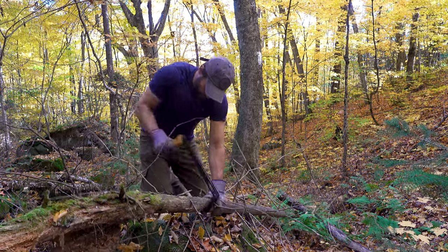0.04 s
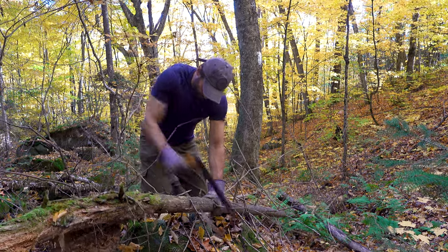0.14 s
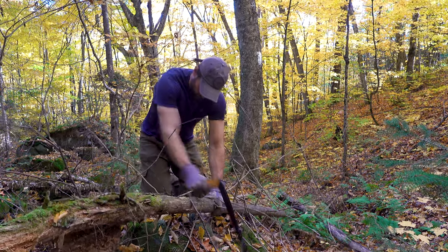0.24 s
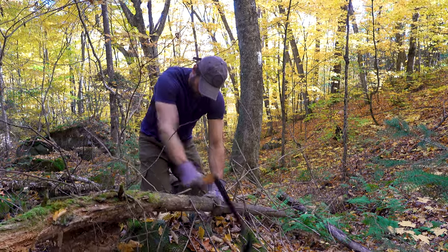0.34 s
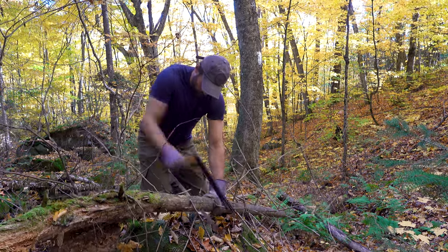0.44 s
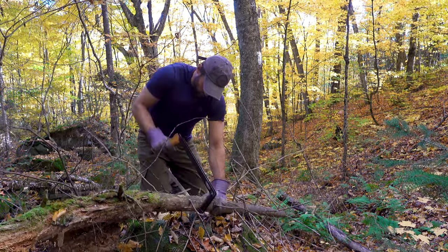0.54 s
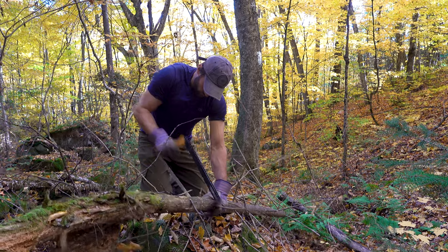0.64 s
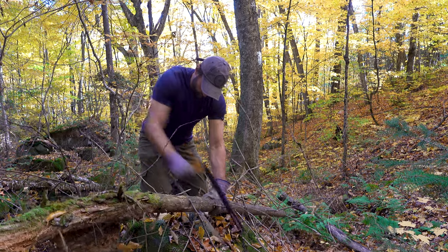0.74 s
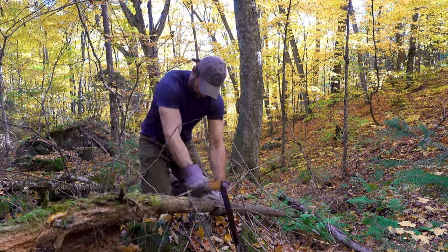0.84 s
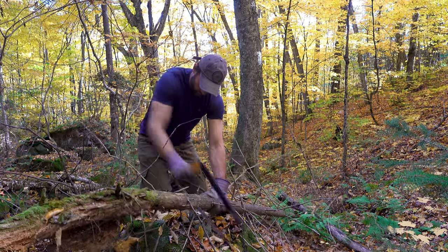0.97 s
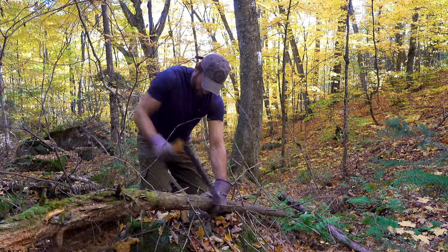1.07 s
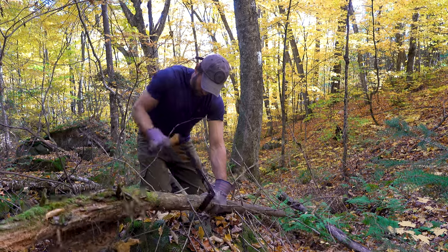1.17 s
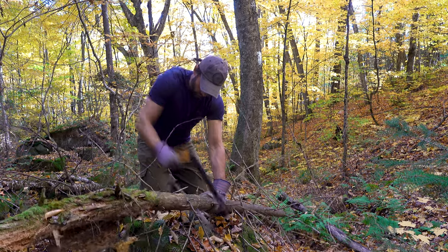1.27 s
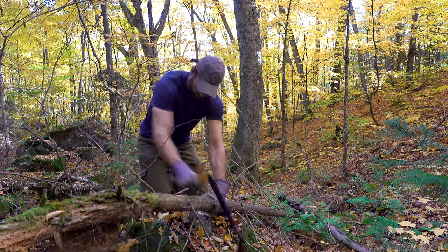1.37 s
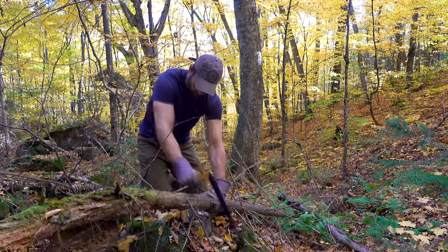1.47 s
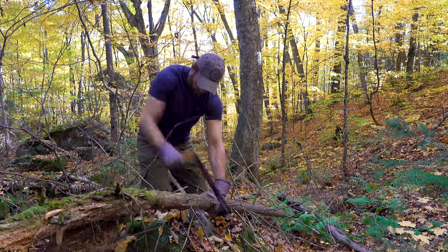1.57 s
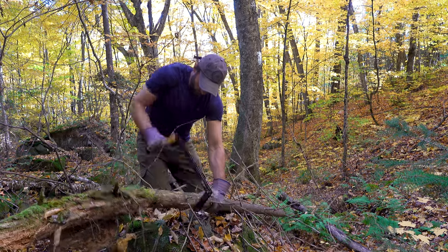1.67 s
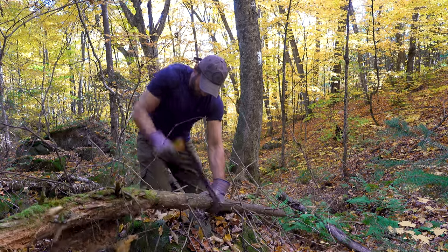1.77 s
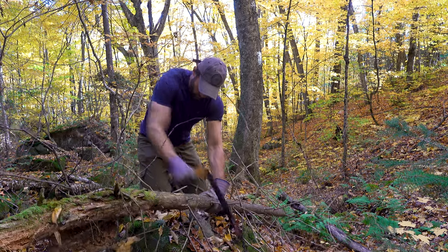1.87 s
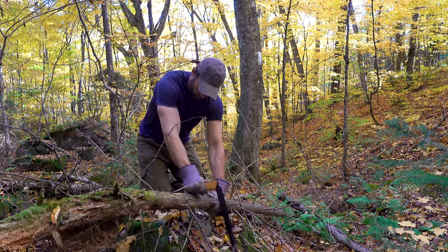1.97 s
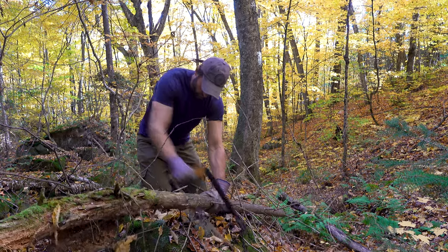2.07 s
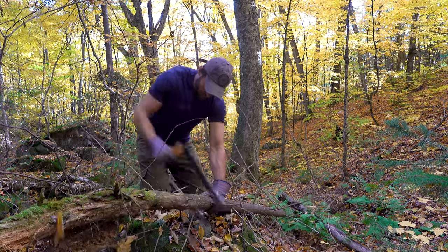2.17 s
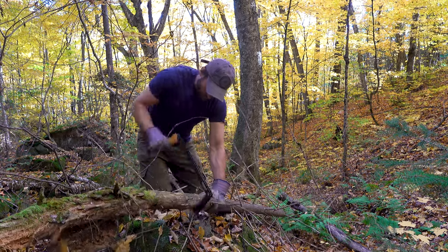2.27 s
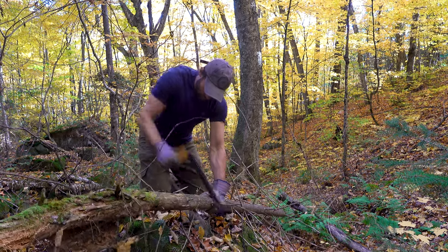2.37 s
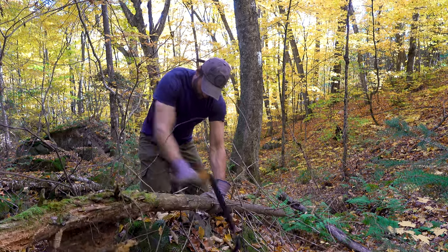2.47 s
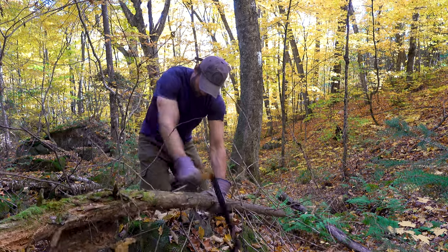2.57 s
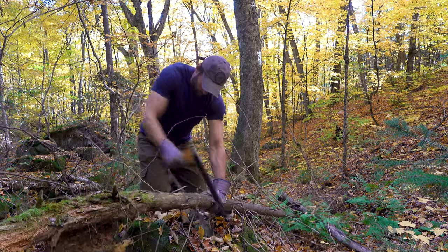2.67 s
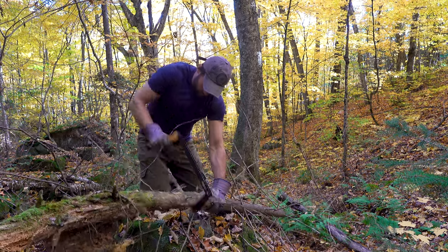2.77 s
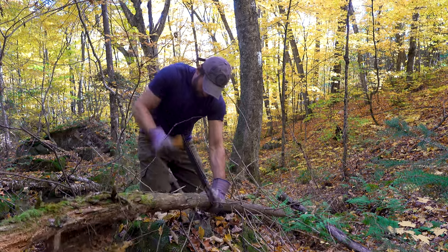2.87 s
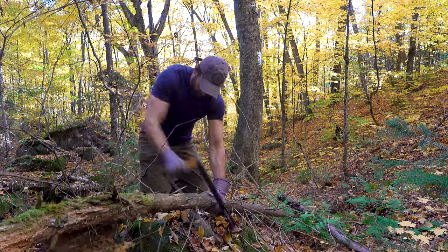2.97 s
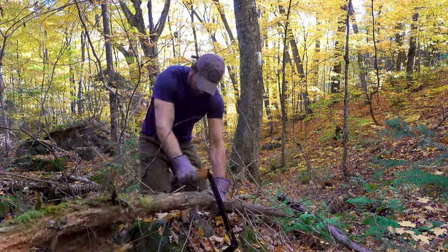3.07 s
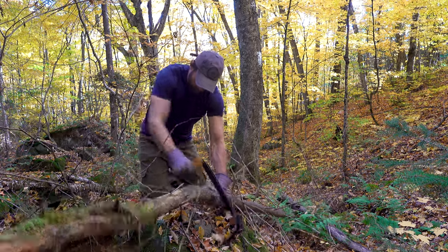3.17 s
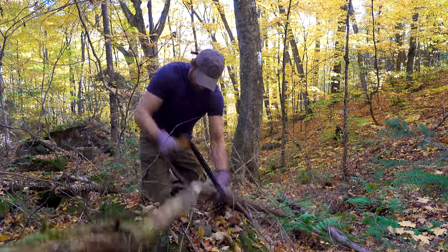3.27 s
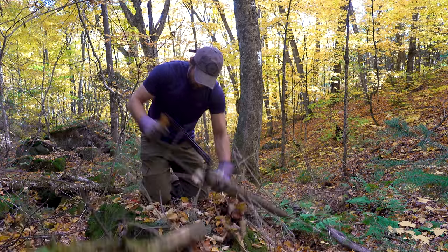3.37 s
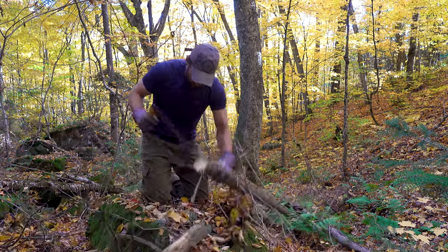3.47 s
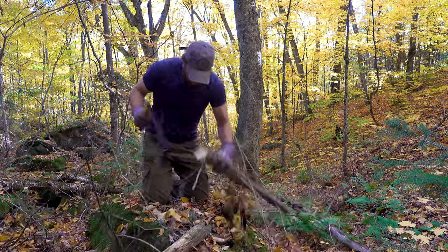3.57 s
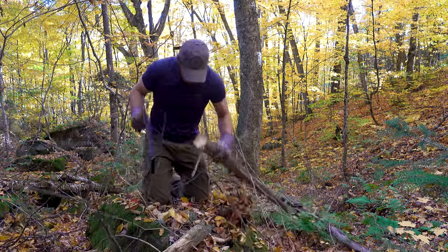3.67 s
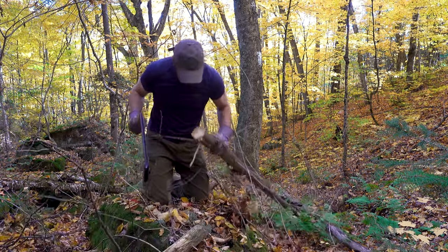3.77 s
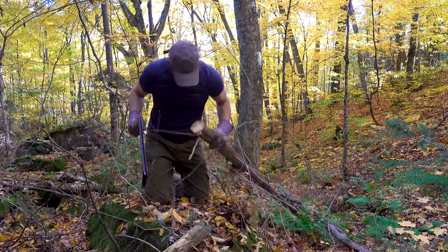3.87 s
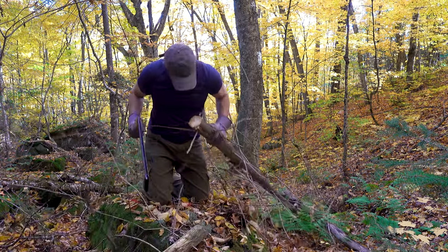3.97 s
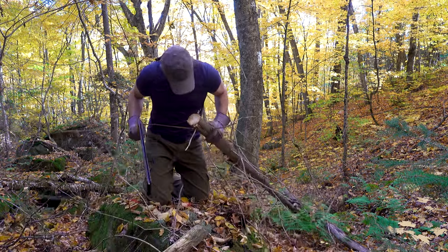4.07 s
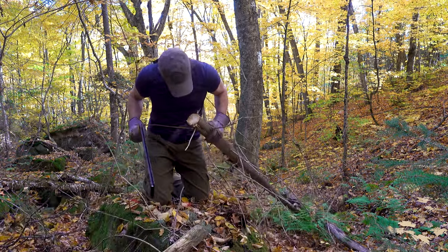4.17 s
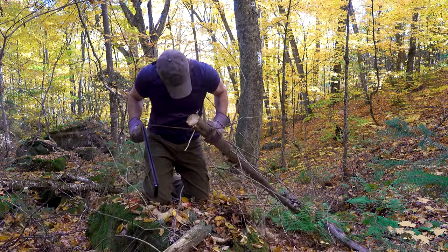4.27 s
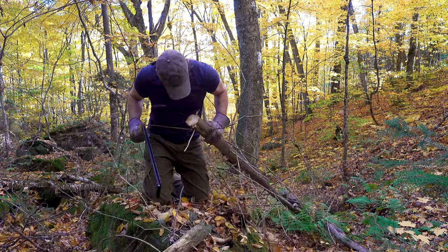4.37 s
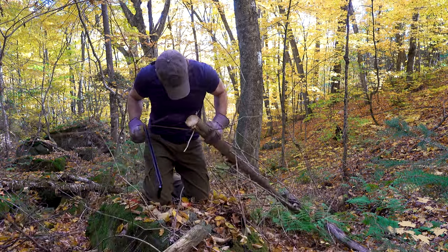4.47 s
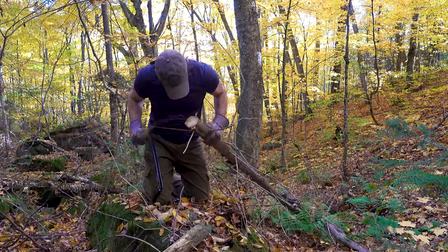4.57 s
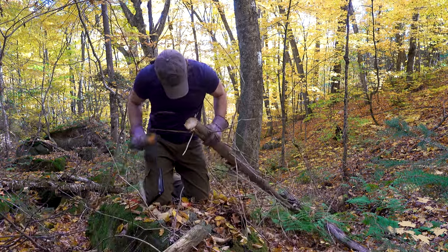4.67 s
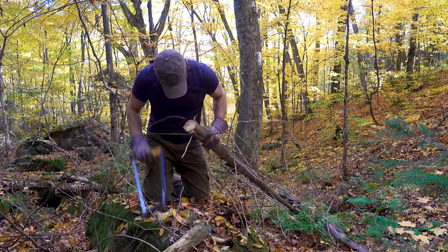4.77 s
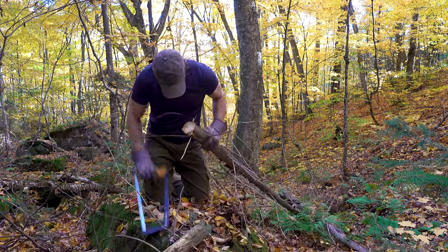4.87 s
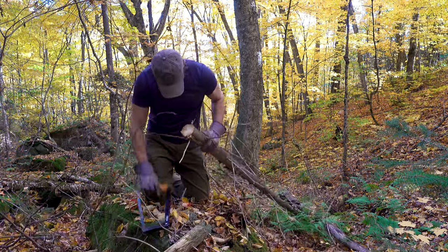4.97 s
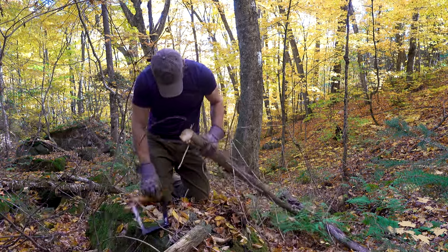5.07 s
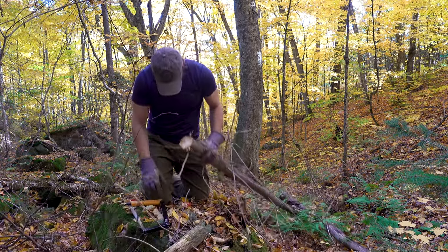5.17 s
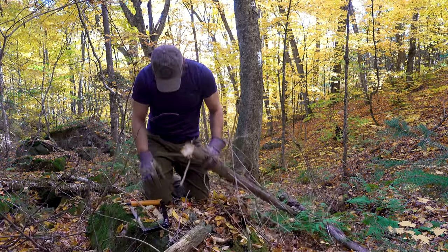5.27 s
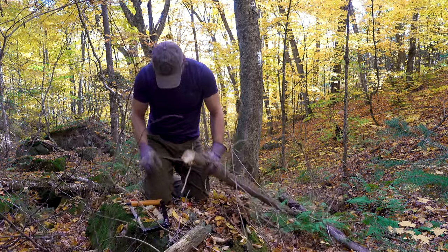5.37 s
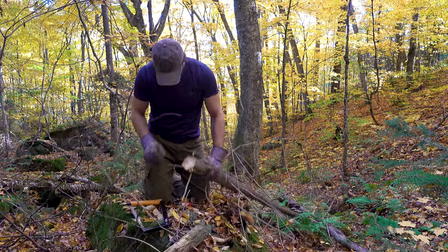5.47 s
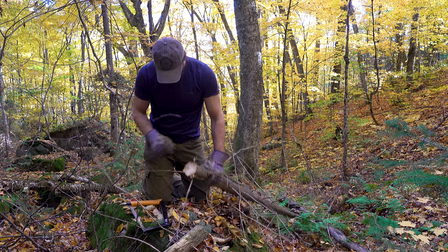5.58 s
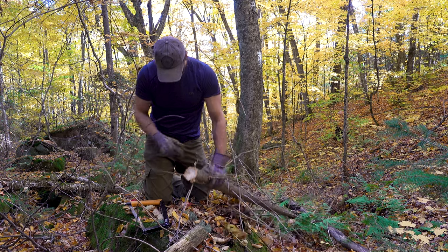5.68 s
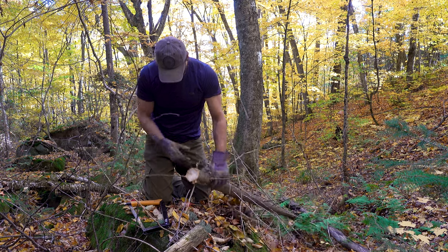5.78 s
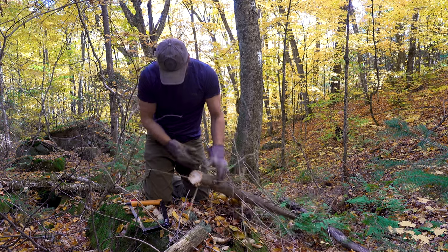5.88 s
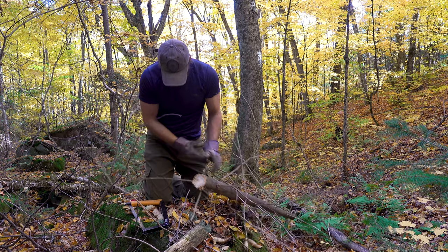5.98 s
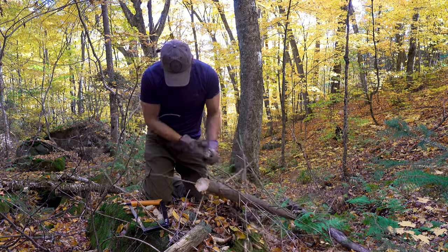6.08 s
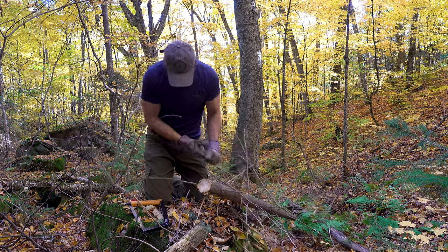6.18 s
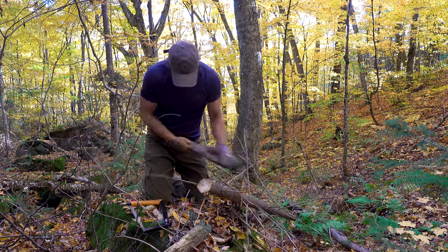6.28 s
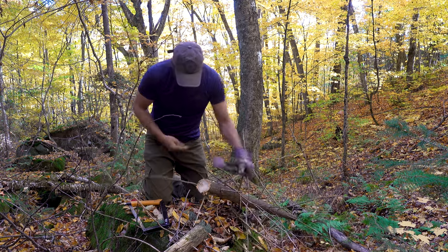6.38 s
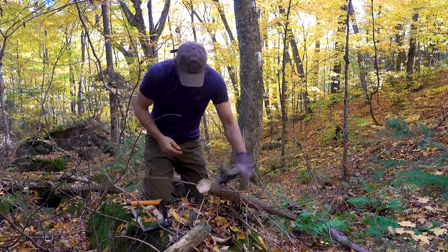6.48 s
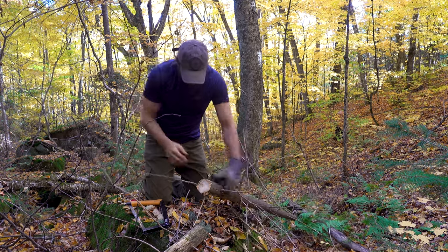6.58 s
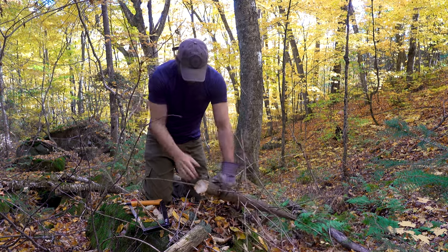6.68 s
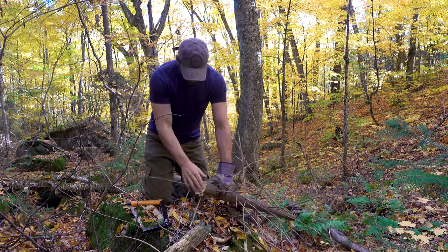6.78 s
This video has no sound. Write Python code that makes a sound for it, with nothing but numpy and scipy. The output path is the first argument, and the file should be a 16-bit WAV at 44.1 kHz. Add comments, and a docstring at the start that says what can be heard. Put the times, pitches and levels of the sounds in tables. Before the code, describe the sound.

Back-and-forth hand sawing ends in cracking wood and crunching leaves, then a metallic clank and softer rustles in a quiet forest.

```python
"""Sawing a fallen branch

In a quiet forest a hand saw makes six biting pushes, each after a lighter pull: its teeth strike the
wood and tear fibres, exciting the blade's resonances. The last fibres snap, the log drops into dry
leaves, the saw is tossed down with a clank, and gloves, twigs and leaves rustle as the log is handled."""
import sys
import numpy as np
from scipy import signal
from scipy.fft import rfft, irfft
from scipy.io import wavfile
from scipy.ndimage import uniform_filter1d

SR = 44100
rng = np.random.default_rng(int(sys.argv[2]) if len(sys.argv) > 2 else 0)


def unload_audio(sound):
    """Save the sound as a 16-bit wav file, at the path given as the first command line argument."""
    columns = np.transpose(np.atleast_2d(sound))
    # keep every value between -1 and 1, then stretch to whole-number steps
    steps = np.round(np.clip(columns, -1, 1) * 32767)
    wavfile.write(sys.argv[1], SR, steps.astype(np.int16))


N = 300759
TIME = np.arange(N) / SR

# Jolts of the branch as the blade jams at the end of a pull, and later as the log falls and is handled: (time
# [s], peak level [dB], treble tilt [dB per two octaves])
KNOCKS = [(0.609, -29.5, -11), (1.187, -26.5, -12), (1.727, -24, -14), (2.186, -21.5, 11),
          (2.309, -23.5, -9), (2.833, -10.5, -7), (3.119, -12.5, 6), (3.157, -14.5, 0), (3.208, -16, 1),
          (3.292, -32, -8), (5.748, -39, -7), (6.532, -32.5, 5)]
# Spectral envelope of breaking fibres: (frequency [Hz], relative level [dB])
SNAP_SPECTRUM = [(60, -26), (400, -5.5), (1200, 3), (3200, 4.5), (6000, 3.5), (8300, 7), (10000, -2),
                 (13000, 1.5), (16000, -5)]


def gain_of(db):
    """Amplitude ratio of a level in decibels."""
    return 10 ** (np.asarray(db) / 20)


def unit_rms(x):
    """Normalisation to unit mean power."""
    return x / np.sqrt(np.mean(x ** 2) + 1e-20)


def value_at(points, hz):
    """Interpolation along a logarithmic frequency axis."""
    f, value = np.transpose(points)
    return np.interp(np.log(hz + 1), np.log(f + 1), value)


def add(mix, s, sound):
    """Superposition of a sound on the mix from time s."""
    part = mix[max(round(s * SR), 0):][:len(sound)]
    part += sound[:len(part)]


def split(x, hz, order=4):
    """Complementary filtering into the parts below and above a frequency."""
    low = signal.sosfiltfilt(signal.butter(order, hz, fs=SR, output="sos"), x)
    return low, x - low


def slow_noise(count, span):
    """A moving average over span samples leaves only slow fluctuations."""
    return unit_rms(uniform_filter1d(rng.standard_normal(count), span))


def crackle(per_s, spread_db, count):
    """A Poisson train of impulses: many small, a few large."""
    size = gain_of(spread_db * np.minimum(rng.exponential(1, count), 4))
    return unit_rms(size * rng.choice([-1, 1], count) * (rng.random(count) < per_s / SR))


def swell(peak_s, fade_s):
    """Amplitude envelope of a movement: a Gaussian rise and a slower fall."""
    offset = (TIME - peak_s) / fade_s
    return np.exp(-np.where(offset < 0, (offset / 0.81) ** 2, abs(offset) ** 1.24))


def body(spectrum, modes=(), tilt_db=0, size=8192):
    """Minimum-phase impulse response of a broad spectrum with Lorentzian resonances on top."""
    hz = np.fft.rfftfreq(size, 1 / SR)
    lift = 1 + sum((gain_of(db) ** 2 - 1) / (1 + (2 * (hz - f) / width) ** 2) for f, width, db in modes)
    slope = tilt_db * np.log2(np.maximum(hz, 1500) / 3000)
    magnitude = gain_of(value_at(spectrum, hz) + slope) * np.sqrt(np.maximum(lift, 1e-2))
    cepstrum = irfft(np.log(magnitude))
    cepstrum[1:size // 2] *= 2  # folding the cepstrum makes the response causal
    cepstrum[size // 2 + 1:] = 0
    response = irfft(np.exp(rfft(cepstrum)))[:size // 2]
    return response / np.linalg.norm(response)


def impact(response, peak_db, t60, scatter, count=6000):
    """Impulse excitation: one sharp contact and a dying spray of smaller ones ring a body."""
    force = scatter * crackle(11000, 2.3, count) * np.exp(-np.log(1000) * TIME[:count] / t60)
    force[0] += 1
    sound = signal.fftconvolve(force, response)
    return gain_of(peak_db) * sound / abs(sound).max()


def moving_contact(x, depth_db, across_hz, lasting_s):
    """Spectral modulation: patches of the spectrum come and go as the point of contact moves."""
    spectra = signal.stft(x, nperseg=512, noverlap=384)[2]
    patches = rng.standard_normal(spectra.shape)
    patches = uniform_filter1d(patches, round(across_hz * 512 / SR), axis=0)
    patches = uniform_filter1d(patches, round(lasting_s * SR / 128), axis=1)
    spectra *= gain_of(depth_db * unit_rms(patches))
    return unit_rms(signal.istft(spectra, nperseg=512, noverlap=384)[1][:len(x)])


def air():
    """Stationary filtered noise: the hush of the woods."""
    # Ambient spectrum: (frequency [Hz], relative level [dB])
    spectrum = [(20, -3), (50, 0), (130, -4.5), (400, -1), (1100, -2), (2400, -5), (3800, -3.5),
                (6900, -5.5), (8500, -5.5), (9700, -11.5), (13500, -14), (16000, -22)]
    return gain_of(-58.5) * unit_rms(signal.fftconvolve(rng.standard_normal(N), body(spectrum))[:N])


def forest_reverb(x):
    """Scattering from trunks leaves a thin tail in which the bass lasts longest."""
    # Reverberation of the forest: (frequency [Hz], 60 dB decay time [s])
    decay_times = [(100, 0.97), (1000, 0.55), (4000, 0.61), (14000, 0.65)]
    echoes = crackle(2100, 0.91, SR) * (TIME[:SR] > .012)
    hz, t, spectra = signal.stft(echoes, SR, nperseg=256)
    decay = np.exp(-np.log(1000) * t / value_at(decay_times, hz)[:, None])
    tail = signal.istft(spectra * decay, SR, nperseg=256)[1]
    return signal.fftconvolve(x, tail / np.linalg.norm(tail))[:N]


def ground_rumble():
    """Ground-borne vibration: soft soil rumbles as the log lands and rolls to rest."""
    # Movements of the log: (peak time [s], fade time [s], relative level [dB])
    settling = [(3.33, 0.15, -57), (3.68, .07, -62)]
    band = signal.butter(2, [40, 95], "band", fs=SR, output="sos")
    rumble = unit_rms(signal.sosfilt(band, rng.standard_normal(N)))
    return gain_of(-2) * rumble * sum(gain_of(db) * swell(s, fade) for s, fade, db in settling)


def leaves():
    """Incoherent sources add in power: leaf fractures and twig ticks over brushing bark and cloth."""
    # Movements: (peak time [s], fade time [s], relative crunch level [dB], brushing re crunch [dB],
    # treble re crunch [dB])
    rustles = [(3.222, 0.026, -36.5, 2, -2), (3.292, 0.044, -35.5, -5.5, 1.5),
               (3.375, 0.062, -36, -2, -0.5), (3.445, 0.065, -30.5, -6, -2.5), (3.55, 0.073, -40, -4, -2),
               (3.68, 0.096, -46.5, -4, -3.5), (3.9, 0.24, -50, -5, -2.5), (4.25, 0.17, -55, -2, 1),
               (4.42, 0.11, -53.5, -12, -2), (4.966, 0.031, -41.5, -3, -3), (5.02, 0.037, -45.5, -13, -11),
               (5.12, 0.16, -45, -3.5, -6.5), (5.38, .1, -54.5, -1, -2), (5.62, 0.21, -50, -2.5, -1),
               (5.74, 0.059, -49.5, -5.5, -2), (5.92, 0.1, -55.5, 1, -5), (6.065, 0.085, -48.5, -4, -4),
               (6.142, 0.038, -47, -9, -0.5), (6.273, 0.065, -51, -0.5, -5.5), (6.5, 0.095, -62, -8, -14),
               (6.68, .06, -58.5, -6, -16)]
    # Spectrum of dry leaves: (frequency [Hz], relative level [dB])
    spectrum = [(40, -20), (200, -6.5), (500, -1), (850, 3.5), (1400, 3.5), (2300, 1.5), (3700, 0.5),
                (6500, -1), (8400, 6), (9800, -5), (12700, -1.5), (16000, -9.5)]
    stir = np.clip((TIME - 3.18) / 0.018, 0, 1)  # once the branch gives way the leaves never quite rest
    power = (gain_of([[-63], [-66], [-68]]) * stir) ** 2  # crunch, brushing, treble
    for s, fade, db, brush_db, treble_db in rustles:
        power += (gain_of([[db], [db + brush_db], [db + treble_db]]) * swell(s, fade)) ** 2
    clumps = gain_of(1.92 * slow_noise(N, 350))
    fractures = clumps * (crackle(3500, 5.6, N) + 1.23 * rng.standard_normal(N))
    drive = moving_contact(fractures, depth_db=2, across_hz=450, lasting_s=.035)
    brush, crisp = split(signal.fftconvolve(drive, body(spectrum))[:N], 2100)
    crunch, treble = split(crisp, 6030)
    rustle = sum(np.sqrt(p) * unit_rms(band) for p, band in zip(power, (crunch, brush, treble)))
    twigs = crackle(per_s=22, spread_db=2.7, count=N)
    ticks = unit_rms(signal.fftconvolve(twigs, body(SNAP_SPECTRUM, tilt_db=4))[:N])
    tick_gain = gain_of(-11) * np.minimum(np.sqrt(power[0]), gain_of(-49))
    return gain_of(-0.4) * rustle + tick_gain * ticks


def stick_clacks():
    """Colliding sticks ring briefly in two heavily damped, inharmonic modes."""
    # Collisions: (time [s], peak level [dB], lower mode [Hz])
    clacks = [(.421, -26, 1520), (3.239, -18, 2050), (3.299, -18.5, 2500), (3.427, -17, 2860),
              (3.428, -21.5, 1170), (3.465, -23, 1510), (3.5, -23, 1290), (3.536, -15, 1430),
              (3.980, -38, 894), (4.297, -38, 1460), (5.073, -26.5, 1390), (5.357, -36, 1150),
              (5.428, -37, 2180), (6.533, -32, 1560)]
    # Spectrum of a stick: (frequency [Hz], relative level [dB])
    spectrum = [(60, -27), (500, -3.5), (1400, 3), (3000, -1), (7000, -20), (16000, -11)]
    out = np.zeros(N)
    for s, db, hz in clacks:
        stick = body(spectrum, modes=[(hz, 260, 14), (hz * 1.41, 300, 9)])
        add(out, s, impact(stick, db, t60=0.015, scatter=0.2))
    return out


def dropped_saw():
    """Each bounce on the ground excites the free vibration of the steel blade."""
    # Bounces: (time [s], peak level [dB], 60 dB decay time of the clatter [s])
    bounces = [(4.9365, -13.5, 0.027), (4.9381, -21.5, 0.031), (4.947, -26, 0.041), (4.966, -27, 0.067),
               (4.975, -17.5, 0.031), (4.984, -19.5, 0.068), (5.016, -30, 0.15), (5.110, -23.5, 0.044)]
    # Spectrum of the clank: (frequency [Hz], relative level [dB])
    spectrum = [(60, -31), (250, -10.5), (450, -7.5), (750, -18), (1300, -11), (1850, 0.5), (2150, 8),
                (3300, 0), (4500, -2.5), (6800, -20.5), (8400, -8.5), (10000, -28), (14000, -18),
                (16000, -24)]
    # Modes of the loose blade: (frequency [Hz], bandwidth [Hz], gain [dB])
    modes = [(2065, 32, 12.6), (2180, 39, 3.4), (2390, 32, 5.1), (2650, 40, 1.6667), (2780, 40, 12),
             (3170, 49, 16), (3500, 55, 8.5), (4070, 36, 7.5), (5460, 40, 16), (5670, 68, 13.5)]
    out, steel = np.zeros(N), body(spectrum, modes)
    for s, db, t60 in bounces:
        add(out, s, impact(steel, db, t60, scatter=0.3))
    return out


def branch_knocks():
    """Impacts excite the damped modes of the branch and a low thud in the ground beneath."""
    # Spectrum of a knock: (frequency [Hz], relative level [dB])
    spectrum = [(30, -33), (70, -27), (160, -2), (300, -1), (520, 2), (900, 0.5), (1400, -5.5), (3000, -11),
                (8000, -33), (16000, -28.5)]
    # Modes of the branch: (frequency [Hz], bandwidth [Hz], gain [dB])
    modes = [(386, 38, 4.7), (512, 22, 4.7), (865, 68, 4)]
    out, t = np.zeros(N), TIME[:SR // 4]
    for s, db, treble_db in KNOCKS:
        add(out, s, impact(body(spectrum, modes, treble_db / 2), db, t60=0.058, scatter=0.052))
        thud = np.sin(2 * np.pi * 58 * rng.uniform(0.8, 1.14) * t) * np.exp(-t / 0.026)
        thud_db = min(db - 28, -57) - 0.64 * treble_db  # dull knocks shake the ground more
        add(out, s, gain_of(thud_db) * thud)
    return out


def fibre_snaps():
    """Brittle fracture: fibres and twigs release their strain as broadband clicks."""
    # Fractures: (time [s], peak level [dB], treble tilt [dB per octave])
    snaps = [(0.3006, -15.5, 8), (0.4106, -17.5, -1.5), (0.948, -27, -3), (1.474, -26, -5),
             (2.0042, -11, -2), (2.5608, -13, -2.5), (2.6246, -18, -1.5), (2.6418, -19.5, 0),
             (2.8399, -12, 1.5), (3.051, -11, -0.5), (3.0757, -13.5, 3), (3.1183, -14, 0),
             (3.12, -6.5, 0.5), (3.1419, -11, -0.5), (3.1572, -6.5, 4.5), (3.208, -8.5, 2.5),
             (3.365, -11.5, 1), (3.385, -4.5, 3.5), (3.4992, -20, 10), (3.8843, -29, 1), (4.217, -30.5, 3),
             (4.2587, -28, 2.5), (4.867, -32, -2), (5.1573, -26, -1), (5.7473, -18.5, 8),
             (5.821, -28.5, -1), (5.853, -33, 9), (6.133, -21, 0.5), (6.5018, -35, -6), (6.634, -35.5, -3)]
    out = np.zeros(N)
    for s, db, tilt in snaps:
        add(out, s, impact(body(SNAP_SPECTRUM, tilt_db=tilt), db, t60=0.033, scatter=0.21))
    return out


def blade_catches():
    """Friction-induced vibration: the blade catches and sings a brief, wavering tone."""
    # Catches: (time [s], peak level [dB], pitch [Hz])
    catches = [(.228, -28, 2120), (.495, -35, 2080), (.81, -30, 2980), (1.085, -31.5, 2060),
               (1.365, -28, 2600), (1.438, -29.5, 3100), (1.905, -27, 2070), (2.187, -30, 2050),
               (2.752, -33.5, 2080)]
    out, t = np.zeros(N), np.arange(-SR // 20, SR // 20) / SR
    envelope = np.exp(-(t / 0.015) ** 2)
    for s, db, hz in catches:
        cycles = np.cumsum(hz * (1 + 0.024 * slow_noise(len(t), 150))) / SR
        add(out, s + t[0], gain_of(db) * envelope * np.sin(2 * np.pi * cycles))
    return out


def tooth_load(times):
    """Contact force scales the rasp: it rises in a snag and drops when a knock unloads the teeth."""
    # The teeth dig in: (time [s], pulse height [dB])
    snags = [(.125, 3), (.694, 8.5), (.752, -1.5), (1.29, 1.5), (1.431, 7), (1.578, 2), (1.842, 0),
             (2.1, 10), (2.181, 7), (2.22, 12), (2.368, 9), (2.692, 5.5), (2.975, 3)]

    def pulse(at, fade_s):
        """A 2 ms rise under an exponential decay."""
        since = np.maximum(times - at, 0)
        return np.minimum(since / 0.002, 1) * np.exp(-since / fade_s)
    snag_db = sum(db * pulse(at, fade_s=0.016) for at, db in snags)
    relief_db = sum(5 * pulse(at + 0.01, fade_s=0.029) for at, _, _ in KNOCKS)
    return gain_of(snag_db - relief_db)


def flexing_blade(x, bend):
    """The blade's resonances glide as its free length changes, and each wavers as the steel flexes."""
    # Modes of the blade in its kerf: (frequency [Hz], bandwidth [Hz], gain [dB])
    modes = [(778, 123, 5.5), (1357, 48, 6), (2012, 11.7, 13.5), (2077, 24, 13), (2350, 35, -3),
             (2340, 35, 5), (2586, 15, 10), (2805, 11, 10.5), (3154, 17, 10.5), (3194, 39, 5),
             (3512, 42, 7), (4175, 23, 7), (8600, 60, 7.5), (13600, 48, 11)]
    out = x.copy()
    for hz, width, db in modes:
        drift = np.interp(np.arange(len(x)), np.arange(16) * SR * 0.0343, rng.standard_normal(16))
        carrier = np.exp(2j * np.pi * np.cumsum(hz * (1 + bend + .005 * drift)) / SR)
        pole = np.exp(-np.pi * width / SR)
        resonance = 2 * (carrier * signal.lfilter([1 - pole], [1, -pole], x / carrier)).real
        out += (gain_of(db) - 1) * resonance
    return out


def stroke(row, spectrum, speed_exponent, brighten_db, glide, bite_db, uneven, chatter_db):
    """Forced vibration: each tooth strikes the kerf and tears a spray of fibres, louder with speed."""
    start, length, fastest, db, treble_db, top_hz = row
    t = np.arange(0, length + .09, 1 / SR)  # the blade rubs on faintly while the arm turns round
    count = len(t)
    skew = np.log(.5) / np.log(np.clip(fastest, .2, .8))
    arc = np.pi * np.clip(t / length, 0, 1) ** skew
    speed = abs(np.sin(arc)) ** 1.25
    tooth_hz = top_hz * np.maximum(speed, .1) * (1 + .04 * slow_noise(count, 200))
    teeth_passed = np.cumsum(tooth_hz) / SR
    tooth = teeth_passed.astype(int)
    depth = np.exp(uneven * rng.standard_normal(1000))[tooth]
    strikes = np.diff(tooth, prepend=0) * depth
    yielding = signal.butter(1, 260, fs=SR)  # the wood gives, blunting each strike
    strikes = unit_rms(signal.lfilter(*yielding, strikes - strikes.mean()))
    tearing = depth * (.9 + np.exp(-(teeth_passed % 1) / .4))
    fibres = unit_rms(crackle(12000, 2.6, count) * tearing)
    chatter = gain_of(chatter_db * unit_rms(uniform_filter1d(slow_noise(count, 300), 200)))
    fibres = moving_contact(fibres, depth_db=3, across_hz=260, lasting_s=.03)
    drive = (fibres + gain_of(bite_db) * strikes) * chatter
    middle, treble = split(signal.fftconvolve(drive, body(spectrum))[:count], 6240, order=2)
    rasp = unit_rms(middle) + unit_rms(treble) * gain_of(treble_db - brighten_db * np.cos(arc))
    cutting = gain_of(db) * speed ** speed_exponent * tooth_load(start + t)
    rubbing = gain_of(-58.5)
    fade = np.clip(np.minimum(t, t[-1] - t) / 0.0067, 0, 1)
    sound = flexing_blade(rasp * np.hypot(cutting, rubbing) * fade, glide * np.cos(arc))
    return start, sound[max(round(-start * SR), 0):]


def saw():
    """Reciprocating excitation: pushes bite deep and leave the blade ringing; pulls skate on the wood."""
    # Strokes: (start [s], duration [s], fastest moment [share of duration], relative level [dB],
    # treble re middle [dB], top tooth rate [Hz])
    pushes = [(0.1, 0.24, .47, -31, -6.5, 350), (0.66, 0.25, 0.55, -32.5, -5, 332),
              (1.238, 0.25, 0.51, -32.5, -7, 318), (1.795, 0.25, .47, -30.6, -6, 311.8),
              (2.333, 0.27, 0.53, -32, -5.5, 313.8), (2.891, 0.28, .43, -32.5, -4, 293.8)]
    pulls = [(-0.178, 0.23, 0.54, -35, -12, 380), (0.4, 0.25, .48, -39.5, -10.5, 388),
             (0.98, 0.23, 0.49, -40.5, -9, 365), (1.55, 0.23, .4, -40, -7, 366.6),
             (2.09, 0.25, .5, -40.5, -7.5, 332.5), (2.635, 0.28, 0.47, -38.5, -7.5, 335)]
    # Spectra of the cut: (frequency [Hz], relative level [dB])
    push_spectrum = [(40, -23), (130, -18), (260, -7), (450, -5), (750, -1.5), (1050, -1.5), (1800, -1),
                     (3000, 2), (4000, -2.5), (6300, -7), (8500, -3), (9700, -12.5), (13700, -7.5),
                     (16000, -13)]
    pull_spectrum = [(40, -25), (150, -20.5), (400, -9.5), (750, -8), (1500, -4.5), (3000, -3.5),
                     (4400, -7), (6500, -10.5), (8500, -3.5), (9700, -13), (13700, -8.5), (16000, -11.5)]
    out, t = np.zeros(N), TIME[:SR // 2]
    ring_envelope = gain_of(-49) * np.minimum(t / .015, 1) * np.exp(-t / 0.069)
    for row in pushes:
        add(out, *stroke(row, push_spectrum, speed_exponent=1.31, brighten_db=3, glide=-0.015,
                         bite_db=-17, uneven=0.091, chatter_db=1.15))
        freed_s = row[0] + .8 * row[1]  # late in the push the blade comes free
        ring_hz = 2000 * rng.uniform(0.95, 1.01)
        add(out, freed_s, ring_envelope * np.sin(2 * np.pi * ring_hz * t))
    for row in pulls:
        add(out, *stroke(row, pull_spectrum, speed_exponent=0.83, brighten_db=1.5, glide=0.0061,
                         bite_db=-27, uneven=0.13, chatter_db=0.76))
    return out


def scene():
    """Superposition of the direct sound, its reverberation among the trees and the background."""
    work = saw() + blade_catches() + branch_knocks() + fibre_snaps()
    work += stick_clacks() + dropped_saw() + leaves()
    return (work + gain_of(-22) * forest_reverb(work) + ground_rumble() + air())[None]


def record(dry):
    """Band limiting: a linear-phase low-pass filter at 15.8 kHz."""
    lowpass = signal.firwin(511, 15800, window=("kaiser", 9), fs=SR)
    return signal.oaconvolve(dry, lowpass[None], "same")


dry = scene()
out = record(dry)
unload_audio(out)
```